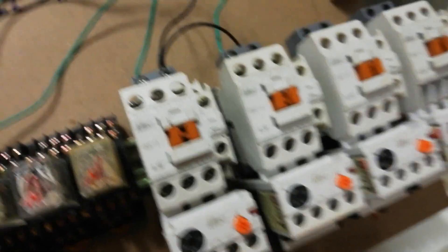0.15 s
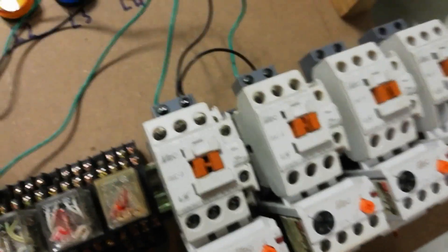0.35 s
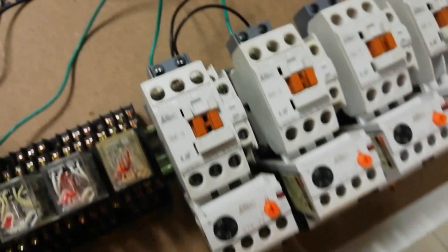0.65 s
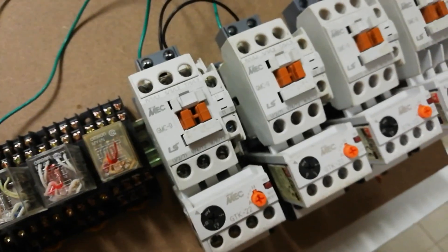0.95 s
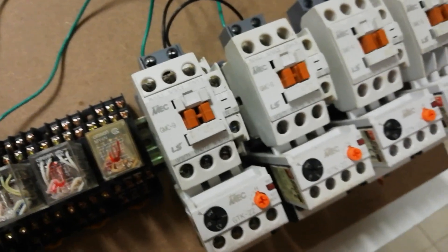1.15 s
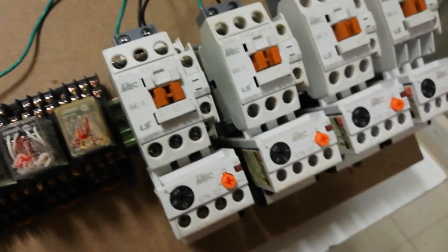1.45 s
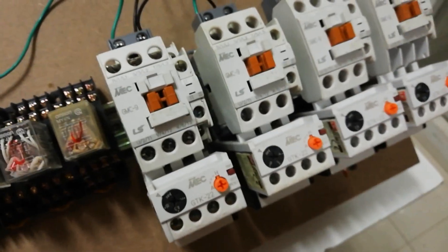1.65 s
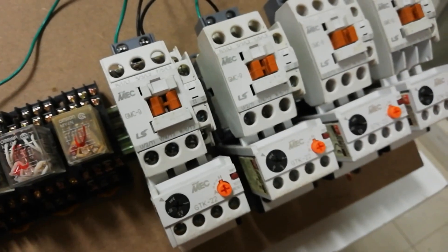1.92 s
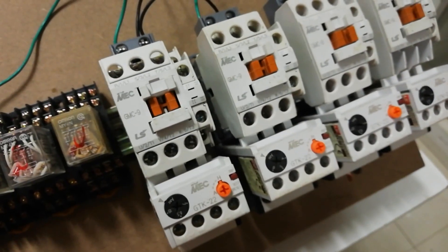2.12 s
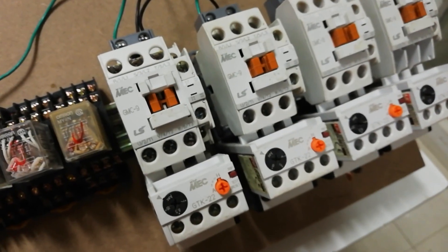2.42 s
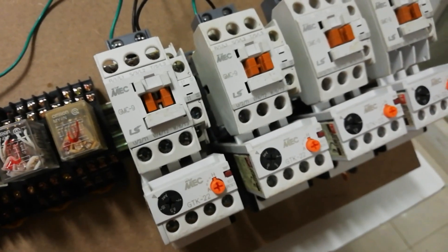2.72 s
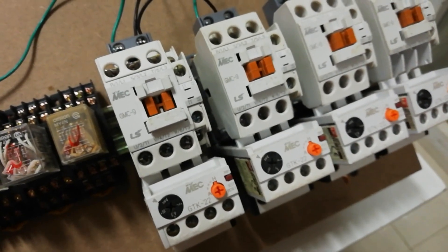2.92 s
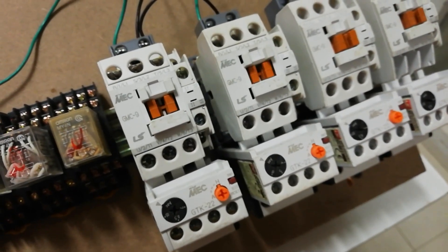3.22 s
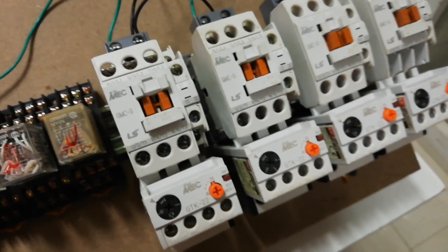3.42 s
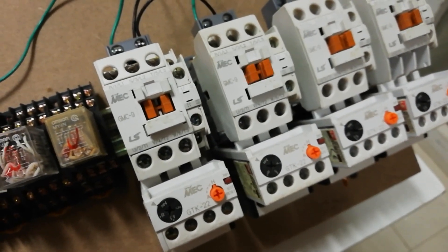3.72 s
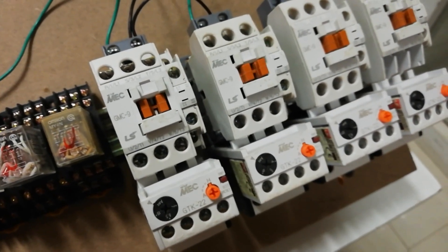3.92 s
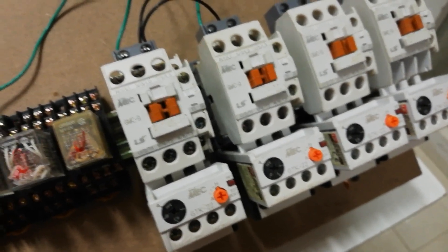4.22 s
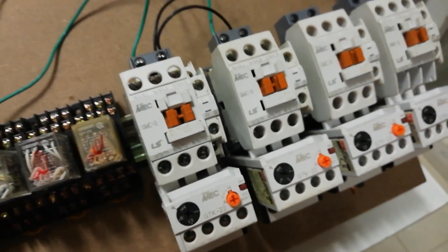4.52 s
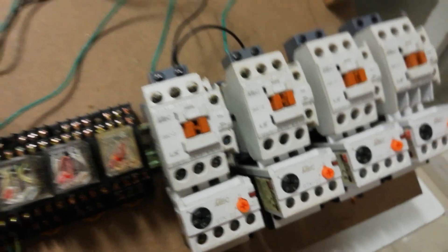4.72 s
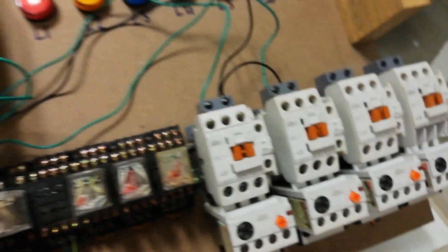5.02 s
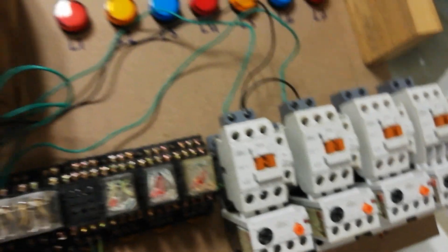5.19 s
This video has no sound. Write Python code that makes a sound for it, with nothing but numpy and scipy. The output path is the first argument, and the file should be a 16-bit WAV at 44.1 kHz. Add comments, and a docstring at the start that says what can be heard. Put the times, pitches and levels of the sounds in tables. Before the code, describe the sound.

Five close, hard clacks of electrical contactors snapping on and off, with light button clicks over a quiet fan.

```python
"""Contactors on a test board

Magnetic contactors on a wooden board drop out once and pull in four times, close by in a small hard room.
A drop-out is one snap and a rebound. A pull-in is three quick blows: the armature sets off, the contacts
touch, the core lands and shakes the board. Buttons click, a hand taps and rustles, coils whine faintly
and a fan runs. A limiter ducks at each clack and swells back through the echo."""
import sys
import numpy as np
from scipy import signal
from scipy.fft import rfft, irfft
from scipy.io import wavfile
from scipy.ndimage import uniform_filter1d, minimum_filter1d

SR = 44100
rng = np.random.default_rng(int(sys.argv[2]) if len(sys.argv) > 2 else 0)


def dump_mix(stems):
    """Bounce the given channels to the path in sys.argv[1] as a 16-bit WAV at rate SR."""
    frames = np.atleast_2d(stems).T  # one column per channel
    limited = np.clip(frames, -1, 1)  # hard clip at full scale
    pcm = np.round(limited * 32767).astype(np.int16)
    wavfile.write(sys.argv[1], SR, pcm)


N = 235919
HZ = np.fft.rfftfreq(4096, 1 / SR)  # filter design grid
SIDES = np.array([[.5], [-.5]])  # splits a left-right level difference


def amp(db):
    """Decibels to gain."""
    return 10 ** (np.asarray(db) / 20)


def unit_rms(x):
    """Scale to rms 1."""
    return x / np.sqrt(np.mean(x ** 2) + 1e-20)


def curve(points, hz):
    """Interpolate (frequency, value) points on a log-frequency axis."""
    point_hz, value = np.transpose(points)
    return np.interp(np.log(hz + 1), np.log(point_hz + 1), value)


def blend(a, b, share):
    """From a (share 0) to b (share 1)."""
    return a + share * (b - a)


def add(mix, at_s, sound):
    """Mix a sound in at at_s."""
    part = mix[:, max(round(at_s * SR), 0):][:, :sound.shape[-1]]
    part += sound[..., :part.shape[1]]


def bell(hz, centre_hz, width_hz):
    """Power response of one resonance."""
    return 1 / (1 + (2 * (hz - centre_hz) / width_hz) ** 2)


def decay(t, t60_s):
    """Envelope falling 60 dB in t60_s."""
    return np.exp(-np.log(1000) * t / t60_s)


def colour(x, gain):
    """Minimum-phase filter shaped by gain over HZ; keeps the power of white noise."""
    log_gain = np.log(np.maximum(unit_rms(gain), 1e-5))
    mirrored = np.concatenate([log_gain, log_gain[..., -2:0:-1]], -1)
    impulse = np.fft.ifft(np.exp(np.conj(signal.hilbert(mirrored)))).real
    return signal.fftconvolve(np.atleast_2d(x), np.atleast_2d(impulse), axes=1)


def diffuse(size, correlation, balance_db):
    """Noise from all around at two microphones; correlation and balance vary with frequency."""
    hz = np.fft.rfftfreq(size, 1 / SR)
    left, other = rfft(rng.standard_normal((2, size)))
    alike = np.clip(curve(correlation, hz), -1, 1)
    right = alike * left + np.sqrt(1 - alike ** 2) * other
    return irfft(np.array([left, right]) * amp(SIDES * curve(balance_db, hz)), size)


def room(build_s=0.0017, patchy_db=2.1):
    """Impulse response: dense, unevenly bunched echoes, each band dying at its own rate."""
    # reverberation (frequency [Hz], T60 [s])
    t60 = [(150, 0.29), (500, 0.37), (1200, 0.38), (3000, 0.42), (6000, 0.38), (10000, 0.34), (15000, .27)]
    # echo likeness (frequency [Hz], left-right correlation)
    correlation = [(200, 0.65), (500, 0), (1000, 0.56), (2000, 0), (12000, 0)]
    # echo balance (frequency [Hz], left over right [dB])
    balance = [(300, 2), (800, 1.5), (1500, 5.5), (3000, 10), (6000, 8.5), (10000, 0.5), (14000, 0.5)]
    hz, t, bands = signal.stft(diffuse(SR, correlation, balance), SR, nperseg=256)
    patches = uniform_filter1d(rng.standard_normal(bands.shape[1:]), size=2, axis=0)
    patches = unit_rms(uniform_filter1d(patches, size=9, axis=1))
    bands = bands * amp(patchy_db * patches) * decay(t, curve(t60, hz)[:, None])
    tail = signal.istft(bands, SR, nperseg=256)[1]
    tail *= 1 - np.exp(-np.arange(tail.shape[1]) / SR / build_s)
    return tail / np.sqrt(np.sum(tail ** 2) / 2)


def reverb(sound):
    """Stereo room echo of a one-row sound."""
    return signal.fftconvolve(sound, room(), axes=1)


def fan(air_db=-50, waver_hz=2.775, flutter=0.19):
    """A fan across the room: rushing air with a few resonances, and wavering tones."""
    # air noise (frequency [Hz], relative density [dB])
    spectrum = [(15, -41), (25, -9), (55, -6), (86, -11), (156, -2.5), (267, -7.5), (313, -9.5),
                (631, -12.5), (722, -10), (1240, -10), (1410, -17), (1750, -18.5), (3720, -20.5),
                (7100, -26.5), (15500, -41.5)]
    # duct resonances (centre [Hz], width [Hz], lift [dB])
    duct = [(320, 108, 7), (1312, 180, -5), (1775, 150, 4.5), (2928, 120, 7.5), (9410, 1900, 7.5)]
    # air likeness (frequency [Hz], left-right correlation)
    correlation = [(60, 0.94), (130, 0.96), (290, 0.8), (640, -0.16), (1410, 0.18), (3100, -0.3),
                   (6820, 0.035), (15000, -0.11)]
    # air balance (frequency [Hz], left over right [dB])
    balance = [(60, -0.5), (110, 0.5), (200, -0.5), (380, 3.5), (700, 0.5), (1290, 3.5), (2380, 10.5),
               (4400, 8.5), (8120, 2.5), (15000, -3)]
    # hum (frequency [Hz], level [dB])
    tones = [(64.6, -71), (161.5, -64.5), (323.0, -61), (721.4, -72), (1206, -75.5), (1249, -71),
             (1723, -76), (2853, -74.5)]
    hz, t = np.fft.rfftfreq(N, 1 / SR), np.arange(N) / SR
    shape_db = curve(spectrum, hz) + sum(db * bell(hz, centre, width) for centre, width, db in duct)
    air = irfft(rfft(diffuse(N, correlation, balance)) * amp(shape_db), N)
    out = amp(air_db) * unit_rms(air)
    knots_s = np.linspace(0, t[-1], 60)
    for tone_hz, db in tones:
        drift, swell = (np.interp(t, knots_s, row) for row in rng.standard_normal((2, len(knots_s))))
        phase = 2 * np.pi * np.cumsum(tone_hz + waver_hz * drift) / SR
        out += amp(db) * np.sqrt(2) * (1 + flutter * swell) * np.sin(phase)
    return out


def rustles(centre_hz=8430, width_hz=3000, grain_db=3, room_db=-1):
    """Skin and cloth slide: fine grains under a short stroke."""
    # hand movements (time [s], length [s], level [dB])
    strokes = [(0.022, 0.08, -61.5), (0.4, 0.04, -61), (1.36, .16, -57), (1.709, 0.072, -49),
               (4.006, 0.16, -62.5), (4.454, 0.023, -45), (5.249, 0.05, -58.5)]
    out = np.zeros((2, N))
    for at_s, length_s, db in strokes:
        progress = np.linspace(0, 1, round(length_s * SR))
        grains = rng.standard_normal((2, len(progress)))
        grains *= amp(grain_db * np.minimum(rng.exponential(1, len(progress)), 4))
        friction = unit_rms(grains * progress * (1 - progress) ** 2)
        stroke = amp(db) * colour(friction, bell(HZ, centre_hz, width_hz))
        add(out, at_s, stroke)
        add(out, at_s, amp(room_db) * reverb(stroke[:1]))
    return out


def buttons(snap_db=-15, snap_s=0.00044, snap_width_hz=1500, dull_hz=6000,
            focus_db_oct=6, pan_db=15.5, room_db=1):
    """A button snaps over and rings its panel, favouring one pitch; plastic dulls the click."""
    # clicks (time [s], level [dB], most excited pitch [Hz], panel ring [dB])
    presses = [(0.029, -34.5, 2730, -3.5), (2.3361, -26.5, 1980, -1), (2.473, -33.5, 2300, -3),
               (2.494, -19, 1370, -12.5), (4.032, -32, 1630, -3)]
    # button and panel modes (frequency [Hz], level [dB], T60 [s], panel share [0-1])
    modes = [(977, -10, 0.024, 0), (1500, -15.5, 0.011, 0), (1680, -8, 0.036, 0.72),
             (1810, -35, 0.12, 0.51), (1747, -13, 0.12, 1), (2080, -22, 0.0024, 0.38),
             (2150, -18.5, 0.019, 0.061), (2630, -15, 0.0094, 0.68), (2940, -2, 0.0079, 0.41),
             (3040, -9, 0.021, 0.59), (4630, -20, 0.011, 0.019)]
    out, t = np.zeros((2, N)), np.arange(SR // 4) / SR
    for at_s, db, pitch_hz, panel_db in presses:
        ring = np.zeros(len(t))
        for hz, mode_db, t60_s, panel_share in modes:
            gain = amp(mode_db + panel_share * panel_db - focus_db_oct * abs(np.log2(hz / pitch_hz)))
            ring += gain * decay(t, t60_s) * np.sin(2 * np.pi * (hz * t + rng.random()))
        burst = rng.standard_normal(len(t)) * np.exp(-t / snap_s)
        snap = colour(burst, np.sqrt(bell(HZ, pitch_hz, snap_width_hz)))[0, :len(t)]
        click = signal.lfilter(*signal.butter(2, dull_hz, fs=SR), amp(db) * (ring + amp(snap_db) * snap))
        add(out, at_s, click * amp(SIDES * pan_db))
        add(out, at_s, amp(room_db) * reverb(click[None]))
    return out


def taps(cap_hz=2080, width_hz=1200, contact_s=0.0016, pan_db=11, room_db=4.5):
    """A finger taps a hollow plastic cap: one resonance, heard mostly through the room."""
    # finger taps (time [s], level [dB])
    touches = [(.534, -34), (.5466, -41.5), (1.302, -39.5)]
    out, t = np.zeros((2, N)), np.arange(SR // 32) / SR
    for at_s, db in touches:
        burst = rng.choice([-1, 1], len(t)) * np.exp(-t / contact_s)
        tap = amp(db) * colour(burst, bell(HZ, cap_hz, width_hz))
        add(out, at_s, tap * amp(SIDES * pan_db))
        add(out, at_s, amp(room_db) * reverb(tap))
    return out


def blow(db, chatter_s, tilt_db_oct, knock_hz, knock_db, pan_db,
         rise_s=0.00024, ring_s=0.0014, scatter_db=-19, scatter_s=0.00518, low_cut_hz=750):
    """Steel slaps steel and chatters, ringing the case; nearby parts scatter it back."""
    # case resonances (centre [Hz], width [Hz], left [dB], right [dB])
    resonances = [(880, 194, -2.5, -6.5), (1610, 74, -4.5, -15), (2920, 420, 1.5, -13.5),
                  (3320, 120, 1, -53), (4904, 480, 5, -7), (5520, 350, -5, -19), (6600, 770, -4.5, -4),
                  (8500, 2000, -1.5, -4), (10040, 1400, -10.5, -1.5), (12400, 1900, -23.5, -21)]
    t = np.arange(SR // 32) / SR
    attack = np.minimum(t / rise_s, 1) ** 2
    contact = np.exp(-np.maximum(t - chatter_s, 0) / ring_s)
    scatter = amp(scatter_db) * np.exp(-t / scatter_s)
    chatter = rng.choice([-1, 1], (2, len(t))) * attack * (contact + scatter)
    case_power = sum(bell(HZ, hz, width) * amp([[left], [right]]) ** 2
                     for hz, width, left, right in resonances)
    tone_db = tilt_db_oct * np.log2(np.maximum(HZ / 2000, 1))
    tone_db += knock_db * bell(HZ, knock_hz, 0.45 * knock_hz)
    low_cut = HZ ** 4 / (HZ ** 4 + low_cut_hz ** 4)
    sound = colour(chatter, np.sqrt(case_power) * amp(tone_db) * low_cut)
    energy = np.sum(sound ** 2, 1, keepdims=True)
    return amp(db + SIDES * pan_db) * sound * np.sqrt(chatter_s * SR / energy)


def strike(at_s, db, chatter_s, echo_shape_db, room_db, **tone):
    """One blow and its room echo, whose energy follows the blow's."""
    out = np.zeros((2, N))
    add(out, at_s, blow(db, chatter_s, **tone))
    echo = colour(room(), amp(echo_shape_db))
    add(out, at_s, amp(db + room_db) * echo * np.sqrt(2 * chatter_s * SR / np.sum(echo ** 2)))
    return out


def board(place, rise_s=0.00078, room_db=-8):
    """The armature's push rings the board; the mounting place (0 near, 1 far) weights the modes."""
    # board modes (frequency [Hz], level [dB], T60 [s], change at far end [dB])
    modes = [(160, -32.5, 0.5, -22), (229.5, -34.5, 0.62, 8.5), (244.2, -21.5, 0.19, 15),
             (273, 1.5, 0.022, -6), (315.6, -17.5, 0.35, -0.5), (331, -18, 0.42, -10.5),
             (499, -25, 0.055, 5), (793, -47.5, 0.28, 25.5), (820, -36, 0.19, 18.5), (898, -32.5, 0.17, 8)]
    t = np.arange(SR) / SR
    ring = sum(amp(db + place * far_db) * decay(t, t60_s) * np.sin(2 * np.pi * hz * t)
               for hz, db, t60_s, far_db in modes)
    ring *= 1 - np.exp(-t / rise_s)
    return ring + amp(room_db) * reverb(ring[None])[:, :len(t)]


def springs(pitch_hz, focus_db_oct=14, pan_db=5, room_db=-2):
    """Springs and steel core ring on after a clack: thin lines, strongest near one pitch."""
    # steel modes (frequency [Hz], level [dB], T60 [s])
    modes = [(2480, -6.5, 0.64), (2840, -11, 0.346), (3140, -7, 0.23), (3296, -13, 0.21),
             (3350, -4.5, 0.51), (3420, -0.5, 0.24), (5640, 0, 0.33), (5610, 0, 0.19), (5770, 6, 0.17),
             (6070, -4, .35), (7780, -0.5, 0.27)]
    ring, t = np.zeros((2, SR)), np.arange(SR) / SR
    for hz, db, t60_s in modes:
        gain = amp(db - focus_db_oct * abs(np.log2(hz / pitch_hz)))
        ring += gain * decay(t, t60_s) * np.sin(2 * np.pi * (hz * t + rng.random((2, 1))))
    return amp(SIDES * pan_db) * ring + amp(room_db) * reverb(ring[:1])[:, :len(t)]


def spring_lift_db(spring_hz, spring_db, threshold_db=-38, slope=0.88):
    """A strongly ringing spring lifts the echo spectrum around its pitch."""
    return slope * max(spring_db - threshold_db, 0) * bell(HZ, spring_hz, 0.11 * spring_hz)


def drop_out(at_s=1.0124, rebound_s=0.0118, board_db=-23, spring_hz=3450, spring_db=-32.5, room_db=-2.5):
    """The coil lets go; the spring throws the armature against its stop, where it rebounds once."""
    # spectrum sent into the room (frequency [Hz], relative density [dB])
    send = [(290, -75), (500, -17.5), (611, -27), (851, -13.5), (1170, -13), (1390, -17), (1670, -8),
            (2040, -13), (3380, -10), (3850, -11), (6200, -2), (7670, -1), (10100, -1), (15500, -27)]
    echo = dict(echo_shape_db=curve(send, HZ) + spring_lift_db(spring_hz, spring_db), room_db=room_db)
    out = strike(at_s, db=12.5, chatter_s=0.0012, **echo,
                 tilt_db_oct=1, knock_hz=1074, knock_db=9, pan_db=-2.5)
    out += strike(at_s + rebound_s, db=-7.5, chatter_s=0.0038, **echo,
                  tilt_db_oct=-0.5, knock_hz=6100, knock_db=-3, pan_db=-1)
    add(out, at_s, amp(board_db) * board(place=0.93) + amp(spring_db) * springs(spring_hz))
    return out


def pull_in(land_s, db, chatter_s, tilt_db_oct, start_db, contact_db, board_db, bench_db, place,
            spring_hz, spring_db, room_db=-5, recoil_db=-25.5, board_delay_s=0.002):
    """The armature sets off, the contacts touch, the core lands; board, bench and springs ring on."""
    # spectra sent into the room from each end of the board (frequency [Hz], relative density [dB])
    near_send = [(240, -30), (400, -14), (527, -3.5), (660, -22), (800, -3.5), (900, -13.5), (1320, -8.5),
                 (1750, -12.5), (2320, -6), (3400, -3.5), (4300, -4.5), (5700, -7), (7300, -5.5),
                 (9600, -0.5), (15500, -25)]
    far_send = [(240, -50), (400, -2.5), (530, -6.5), (653, -14.5), (815, 1.5), (980, -7), (1550, -2.5),
                (2190, -7), (2900, -3), (3500, -7), (5100, -11), (8750, -7.5), (15500, -22)]
    send_db = blend(curve(near_send, HZ), curve(far_send, HZ), place)
    echo = dict(echo_shape_db=send_db + spring_lift_db(spring_hz, spring_db), room_db=room_db)
    travel_s, contact_lead_s = blend(0.013, 0.0148, place), blend(0.0034, 0.0063, place)
    if place > 0.5:
        landing = dict(knock_hz=790, knock_db=1.3, pan_db=0.42)
    else:
        landing = dict(knock_hz=5560, knock_db=5.7, pan_db=0.5)
    out = strike(land_s - travel_s, start_db, chatter_s=0.003, **echo,
                 tilt_db_oct=-3, knock_hz=3102, knock_db=9.5, pan_db=2)
    out += strike(land_s - contact_lead_s, contact_db, chatter_s=0.0023, **echo,
                  tilt_db_oct=2, knock_hz=8299.5, knock_db=3, pan_db=0.5)
    out += strike(land_s, db, chatter_s, **echo, tilt_db_oct=tilt_db_oct, **landing)
    shake, shake_s = amp(board_db) * board(place), land_s + board_delay_s
    add(out, shake_s - travel_s, amp(recoil_db) * shake)  # frame recoils as the armature sets off
    add(out, shake_s, shake + amp(bench_db) * bench() + amp(spring_db) * springs(spring_hz))
    return out


def bench(t60_s=0.28, rise_s=0.002):
    """The heavy bench under the board thuds with many close modes."""
    # thud (frequency [Hz], relative density [dB])
    spectrum = [(20, -21), (45, -1.5), (70, -2.5), (85, -2), (115, 5.5), (170, -11.5), (260, -6.5),
                (600, -26.5), (2000, -62)]
    t, hz = np.arange(SR) / SR, np.fft.rfftfreq(SR, 1 / SR)
    phases = np.exp(2j * np.pi * rng.random(len(hz)))
    modes = unit_rms(irfft(amp(curve(spectrum, hz)) * phases, SR))
    return modes * decay(t, t60_s) * (1 - np.exp(-t / rise_s))


def coils():
    """The thin whine of a powered coil."""
    # whines (start [s], end [s], frequency [Hz], level [dB])
    whines = [(2.01, 3.13, 6939, -71), (3.72, 4.23, 6939, -76)]
    out = np.zeros((2, N))
    for start_s, end_s, hz, db in whines:
        t = np.arange(0, end_s - start_s, 1 / SR)
        fade = signal.windows.tukey(len(t), 0.05)
        add(out, start_s, amp(db) * np.sqrt(2) * np.sin(2 * np.pi * hz * t) * fade)
    return out


def scene():
    """Everything that reaches the two microphones."""
    # pull-ins (landing time [s], landing level [dB], landing chatter [s], landing treble tilt [dB/oct],
    # armature start [dB], contacts [dB], board [dB], bench [dB], place [0 near - 1 far],
    # spring pitch [Hz], spring ring [dB])
    pull_ins = [(2.001, 10.5, 0.003, 0.5, -20.5, -19.5, .5, -17, 0.13, 5610, -24.5),
                (3.1341, 7.5, 0.0038, -1.5, -21.5, -6.5, -2, -24.5, 0.0055, 3580, -39),
                (3.714, 7, 0.0034, -1, -19.5, -12.5, -6.5, -28.5, 0.91, 3500, -35.5),
                (4.2367, 7, 0.0028, -4.5, -26, -12, -0.5, -27, 0.98, 2920, -32.5)]
    contactors = drop_out() + sum(pull_in(*row) for row in pull_ins)
    return contactors + buttons() + taps() + rustles() + coils() + fan()


def record(dry, threshold_db=-8, recovery_db_per_s=72, ceiling=4.0, cutoff_hz=16000):
    """Microphone colour, a limiter that ducks at once and recovers steadily, soft clip, low-pass."""
    # microphone response (frequency [Hz], gain [dB])
    mic = [(20, 4), (32, 2.5), (48, 4), (100, -1), (9500, -1), (10300, 1.5), (11500, -1), (13000, 1.5),
           (15500, 1)]
    heard = irfft(rfft(dry) * amp(curve(mic, np.fft.rfftfreq(N, 1 / SR))), N)
    power_db = 10 * np.log10(abs(uniform_filter1d((dry ** 2).mean(0), size=80)) + 1e-12)
    ramp_db = np.arange(N) * recovery_db_per_s / SR
    held_db = np.maximum.accumulate(power_db + ramp_db) - ramp_db
    over_db = np.maximum(held_db - threshold_db, 0)
    duck_db = uniform_filter1d(-minimum_filter1d(-over_db, size=64), size=64)  # brief look-ahead
    limited = ceiling * np.tanh(heard * amp(-duck_db) / ceiling)
    low_pass = signal.firwin(255, cutoff_hz, window=("kaiser", 9), fs=SR)
    return signal.oaconvolve(limited, low_pass[None], "same")


dry = scene()
out = record(dry)
dump_mix(out)
```